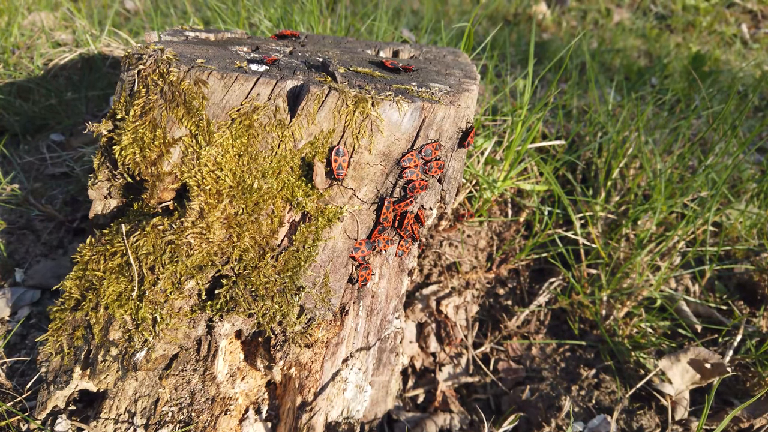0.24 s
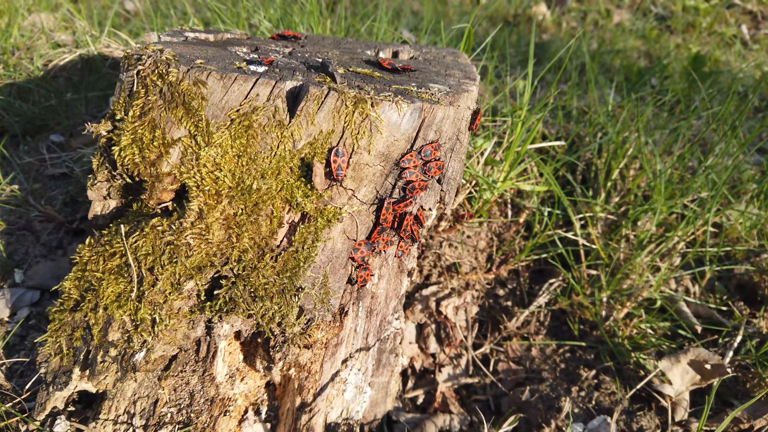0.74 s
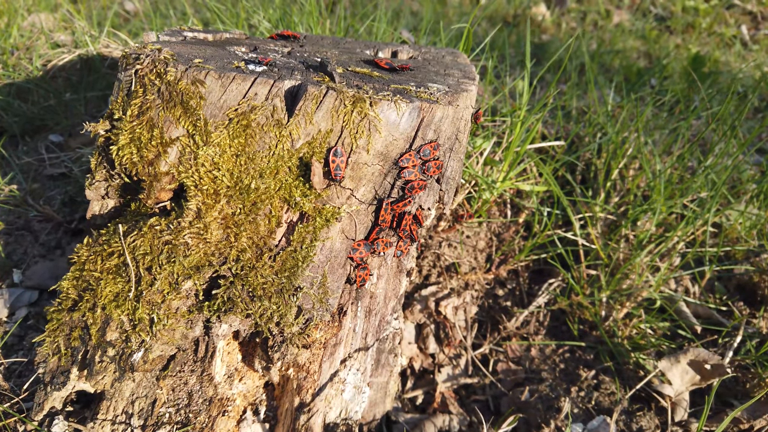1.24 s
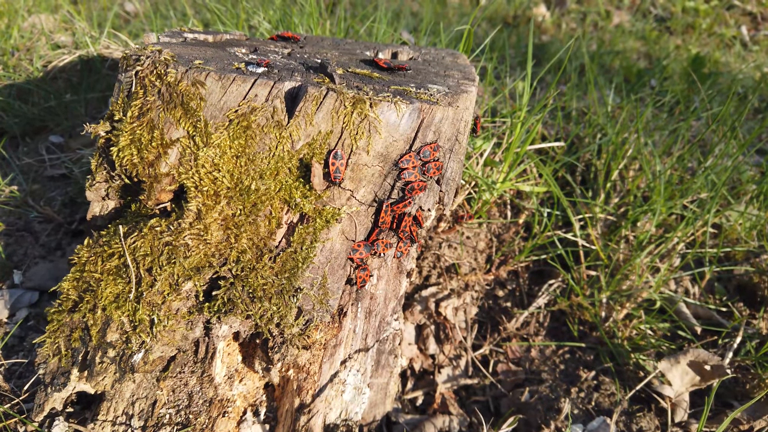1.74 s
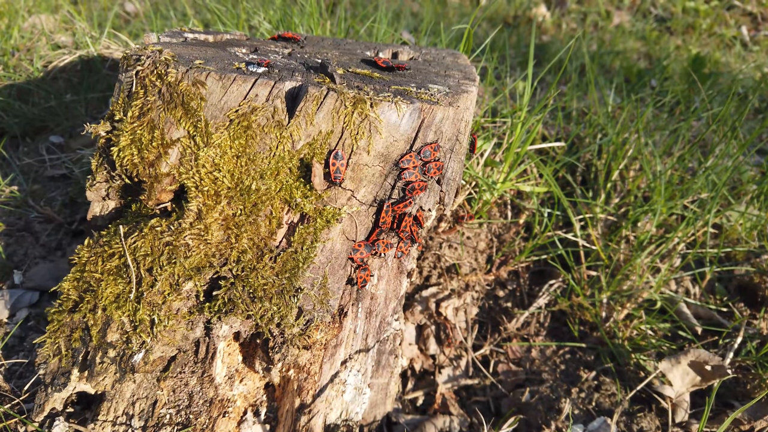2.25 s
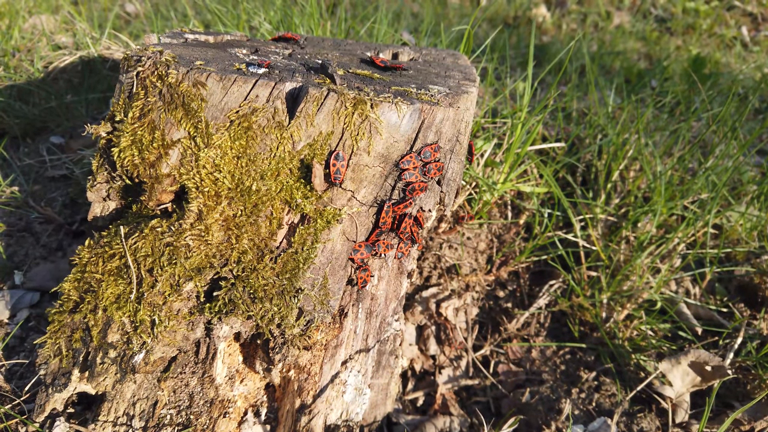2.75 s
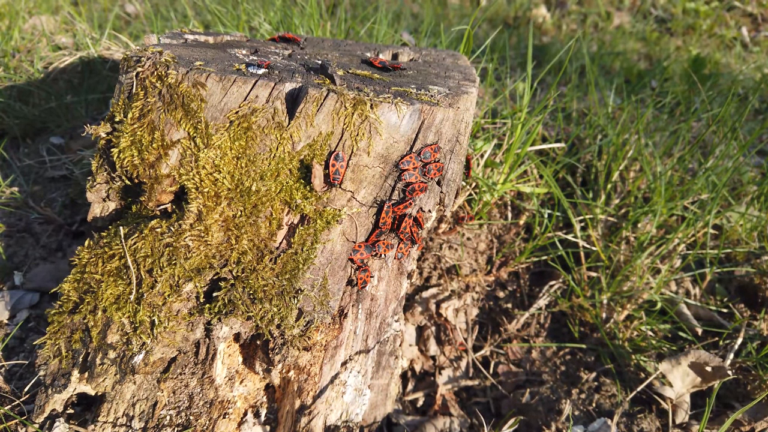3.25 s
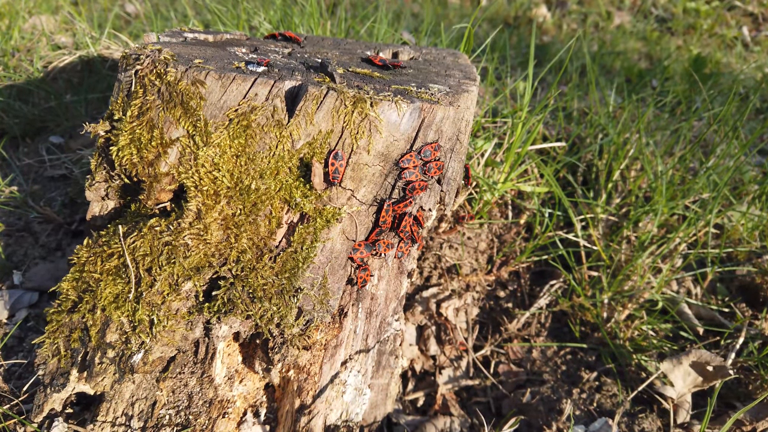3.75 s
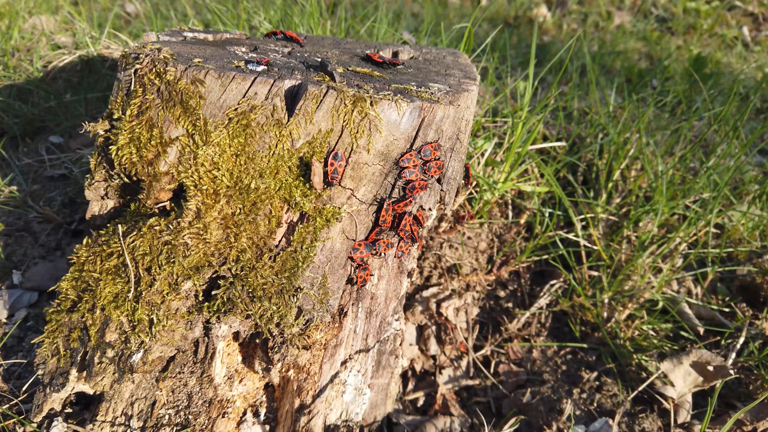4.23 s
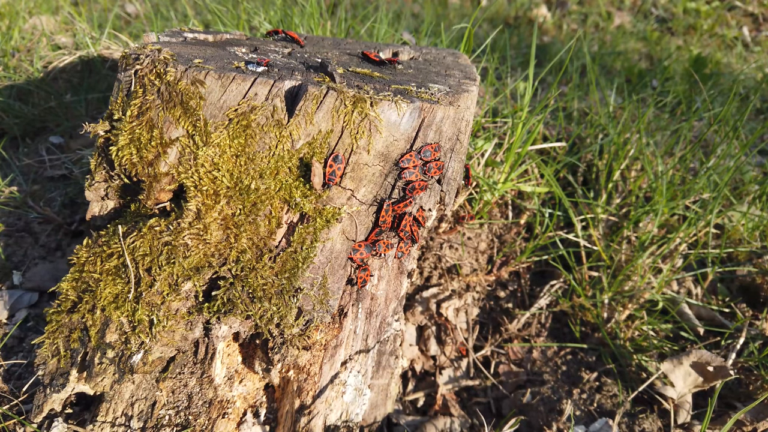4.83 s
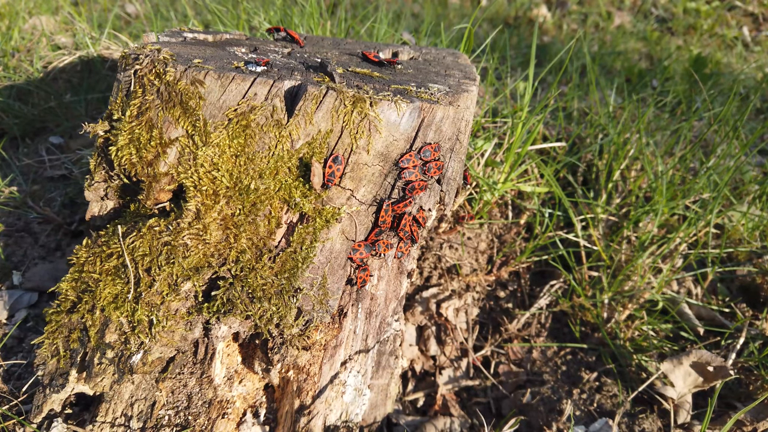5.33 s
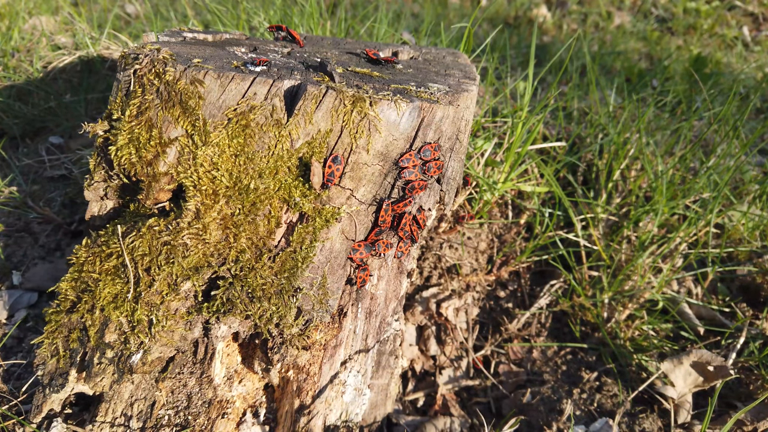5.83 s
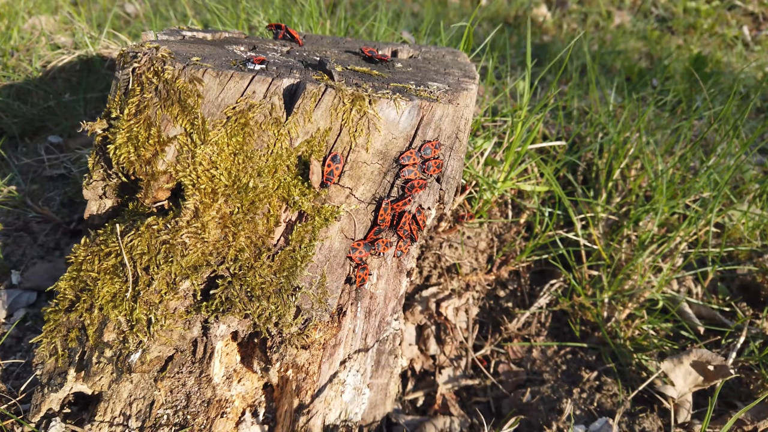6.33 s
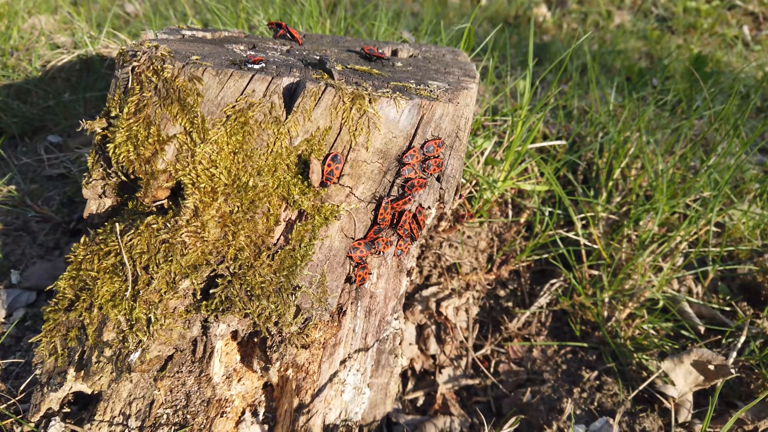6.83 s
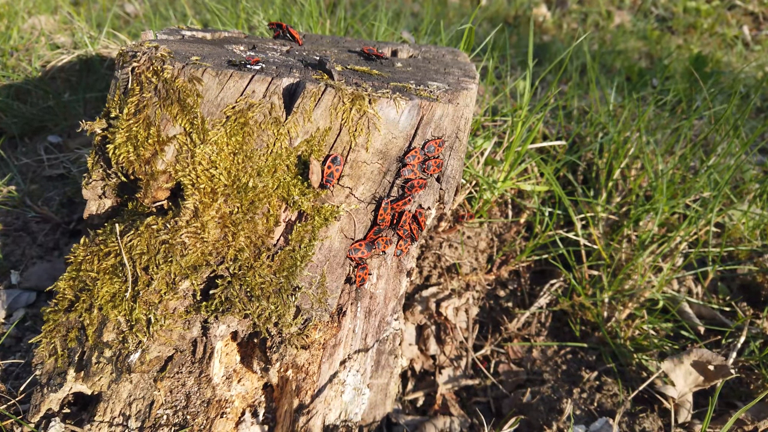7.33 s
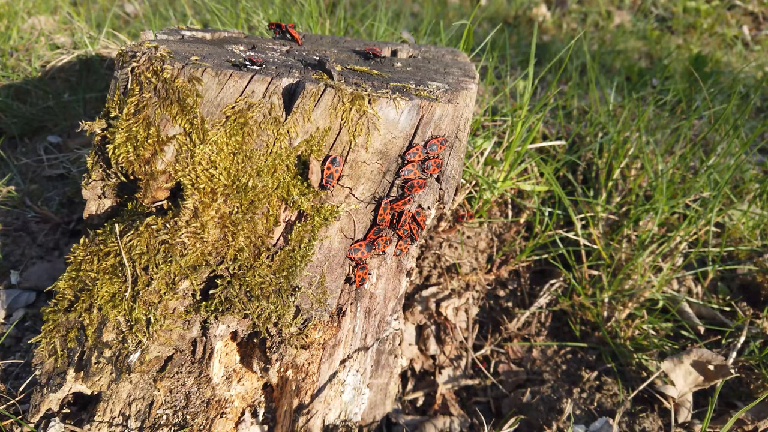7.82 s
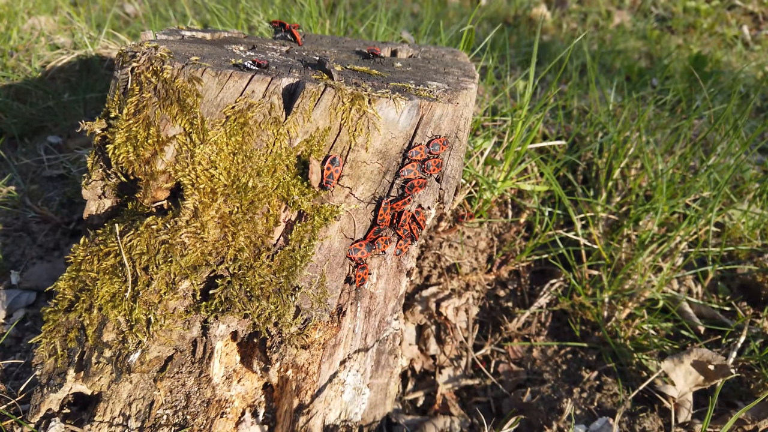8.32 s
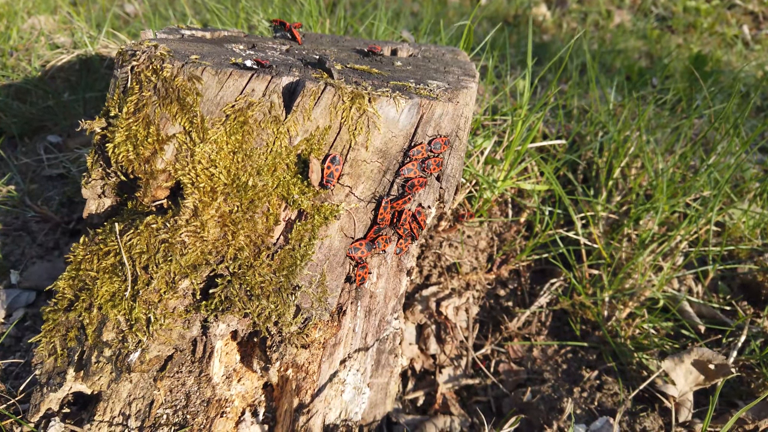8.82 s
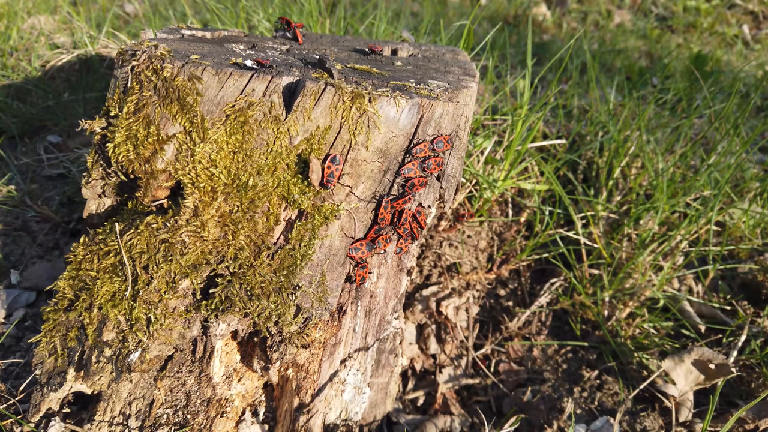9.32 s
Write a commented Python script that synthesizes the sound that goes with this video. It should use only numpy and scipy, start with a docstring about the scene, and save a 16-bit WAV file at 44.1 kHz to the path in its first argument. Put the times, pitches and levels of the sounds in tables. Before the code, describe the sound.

Wide stereo forest-edge ambience with a faint steady hiss, distant rumble and a shifting blur of far birdsong. At 0 s a near, centred songbird's phrase is just ending, while thin two-part calls sound at right. From 0.6 to 2.0 s the near bird sings quavering, hooked and sharply falling chirps. A quieter gap follows; at 2.4 s a bird far right begins a short, overtone-rich arched chirp, repeated irregularly until 7.5 s. The near bird returns at 3.1 s with chips, quick pips and a bright high trill at 4.1-4.5 s, sagging away by 4.7 s. Low piping runs faintly at right from 3.9 to 5.5 s, with a tiny dry tick near 4.8 s. Rolled trills come at 5.3-7.4 s. Near burbles and zigzags flash at 6.4-6.7, 7.4-7.7 and 8.2 s. Small distant whistles and descending chirps finish, mostly right. Every note trails a soft, scattered woodland echo.

```python
"""Forest edge, spring morning, in stereo. Near and dead ahead a songbird sings quick glides, zigzags and a high trill;
far to the right a second repeats an arched call rich in overtones; others whistle, buzz, pipe and roll further off.
Birds and hums are gliding tones with overtones or wavers; the litter ticks are short noise bursts.
Trunks scatter the birds' notes into a long tail of dying noise.
Beneath lie shaped noise for distant rumble and hiss, faint low hums and a patchy noise blur of far song."""
import sys
import numpy as np
from scipy import signal
from scipy.fft import rfft, irfft, next_fast_len
from scipy.io import wavfile

SR = 44100
rng = np.random.default_rng(int(sys.argv[2]) if len(sys.argv) > 2 else 0)


def unload_wav(signal):
    """Save mono or channel-first audio to the path in sys.argv[1] as 16-bit WAV at rate SR, clipped to [-1, 1]."""
    wavfile.write(
        sys.argv[1],
        SR,
        np.round(np.clip(np.atleast_2d(signal).T, -1, 1) * 32767).astype(np.int16),
    )


N = 422037   # samples

# Throughout, a bird's level/dB is its setting ahead of the mix gains in scene().


def from_db(db):
    """Turn decibels into an amplitude factor."""
    return 10 ** (np.asarray(db) / 20)


def rms_one(x):
    """Scale a sound to an rms of 1."""
    return x / np.sqrt(np.mean(x ** 2) + 1e-20)


def at_hz(points, hz):
    """Read a table on a log-frequency axis."""
    points = np.array(points)
    return np.interp(np.log(hz), np.log(points[:, 0]), points[:, 1])


def drift(rate, size=N):
    """Slow noise: random points of spread 1 joined by lines, rate points per s (390 at most)."""
    points = rng.standard_normal(int(size / SR * 400) + 2)
    return np.interp(np.arange(size) / SR * min(rate, 390), np.arange(len(points)), points)


def add(out, start, sound):
    """Mix a stereo sound in at a sample."""
    stop = min(N, start + sound.shape[1])
    out[:, start:stop] += sound[:, :stop - start]


def rounded(t, s, values):
    """A smooth cubic curve through points, flat at its turns."""
    steps = np.diff(values) / np.diff(s)
    same_way = steps[1:] * steps[:-1] > 0
    inner = np.where(same_way, (steps[1:] + steps[:-1]) / 2, 0)
    limit = 2 * np.minimum(abs(steps[1:]), abs(steps[:-1]))   # keeps the curve from overshooting
    slope = np.r_[steps[0], np.clip(inner, -limit, limit), steps[-1]]
    k = np.clip(np.searchsorted(s, t, "right") - 1, 0, len(s) - 2)
    width = np.diff(s)[k]
    u = (t - s[k]) / width
    rise = u * u * (3 - 2 * u)
    bend = width * u * (1 - u) * (slope[k] * (1 - u) - slope[k + 1] * u)
    return values[k] * (1 - rise) + values[k + 1] * rise + bend


def whistle(rows, overtones, pan_db, lag, waver_hz, flutter_db, swing_hz=0):
    """One note of a syrinx: a gliding tone with rounded turns, overtones and soft ends."""
    s, hz, level_db = np.transpose(rows)
    t = np.arange(s[0], max(s[-1], s[0] + .004), 1 / SR)
    pitch = rounded(t, s, hz)
    pitch = pitch + waver_hz * drift(60 + .6 * waver_hz, size=len(t))
    if swing_hz:
        pitch = pitch + swing_hz(t)
    phase = 2 * np.pi * np.cumsum(pitch) / SR + rng.uniform(0, 2 * np.pi)
    ends = np.clip(np.minimum(t - t[0], t[-1] - t) / .006, 0, 1)
    flutter = flutter_db * drift(220, size=len(t))
    gain = np.sqrt(2) * ends * from_db(np.interp(t, s, level_db) + flutter)
    out = np.zeros((2, len(t)))
    for multiple, db in overtones:
        heard = from_db(db - 3.6 * np.clip(multiple * pitch / 1000 - 12.5, 0, 30))   # the air dulls the very top
        behind = at_hz(lag, multiple * pitch)   # radians by which the left side lags
        out += heard * np.sin([multiple * phase - behind, multiple * phase])
    sides = from_db([[min(pan_db, 0)], [min(-pan_db, 0)]])   # pan_db is left minus right
    return round(s[0] * SR), out * gain * sides


def stretched(shape, s, length, top_hz, bottom_hz, level_db, growth_db=0):
    """Fit a shape to the length, range and level of one call."""
    share, height, db = np.transpose(shape)
    hz = bottom_hz + (top_hz - bottom_hz) * height
    return np.transpose([s + length * share, hz, level_db + db + growth_db * (share - .5)])


def sung(shape, calls):
    """All calls of one shape."""
    return [stretched(shape, *call) for call in calls]


# Depth and place of each quaver dip, as shares of the time between dips
DIP_HZ, FIRST_DIP, DIP_AT, BACK_AT = 1650, .57, .5, .85   # FIRST_DIP: share of the full depth
DIP_DB, SLIDE_DB, BACK_SHORT_HZ = -14, -16, 149


def quaver(s, slide, top_hz, rest_hz, length, every, level_db):
    """Slide down to the resting pitch, then dip below it, the first time less deeply."""
    rows = [(s, top_hz, level_db + SLIDE_DB), (s + slide, rest_hz, level_db)]
    for k in range(round(length / every)):
        depth = DIP_HZ * (1 if k else FIRST_DIP)
        rows += [(s + slide + (k + DIP_AT) * every, rest_hz - depth, level_db + DIP_DB),
                 (s + slide + (k + BACK_AT) * every, rest_hz - BACK_SHORT_HZ, level_db),
                 (s + slide + (k + 1) * every, rest_hz, level_db)]
    return rows


# Fast warble on the held high notes: start t/s, end t/s, swing at start f/Hz, swing at end f/Hz, rate/per s
WARBLE = [(4.12, 4.3, 800, 120, 88), (4.34, 4.53, 400, 150, 88)]


def warble(t):
    """The held notes flick up from their floor many times a second, less as they go on."""
    out = 0
    for start, end, first_hz, last_hz, rate in WARBLE:
        swing = np.interp(t, [start - .005, start, end], [0, first_hz, last_hz]) * (t < end + .02)
        out = out + swing * (np.sin(np.pi * rate * (t - start)) ** 4 - .2)
    return out


# Near singer's overtones: multiple of the pitch, level/dB
SONG_OVERTONES = [(2, -22.5), (3, -34.5)]
# Near singer across the stereo microphone: f/Hz, left lag/radians
SONG_LAG = [(1500, 0.39), (3000, 0.65), (4500, 1.35), (6800, 2.54), (9000, 3.46), (15000, 5.2)]
# Syllable shapes: t as share of length, f as height from bottom 0 to top 1, level/dB on top of the call's
SLUR = [(0, 0.96, -8), (.35, .75, -12), (.63, .25, -1.5), (1, 0.029, 4.5)]
HOOK = [(0, .88, -14), (.17, 1, -10), (.35, .62, -2), (.53, .29, -5), (.73, .46, 0), (1, 0, -15)]
CHECK = [(0, .6, -21), (.22, 0.97, -16.5), (.42, 0.67, -6.5), (.58, 0, -3), (1, .18, -8.5)]
CHIP = [(0, 0.803, 9), (.2, 0.94, -1.5), (.7, .72, -0.5), (1, 0, -4.5)]
ZIGZAG = [(0, -.45, -1.5), (.12, .88, -5), (.23, 0.985, -7.5), (.36, 0, -1.5), (.51, .78, -1), (.64, 0, -3),
          (.73, .57, 0), (1, .52, -9.5)]
DROP = [(0, 0.93, -1), (.22, 0.34, -1), (.5, .13, -10.5), (1, 0, -11)]
PIP = [(0, 0.99, 18.5), (.2, 0.037, -4.5), (1, 0, 5.5)]
TWITTER = [(0, 0.049, -20), (.34, 0.97, -8.5), (.54, .58, -7), (.76, .93, -0.5), (1, 0.52, -4)]
BURBLE = [(0, 0, -22.5), (.27, 0.99, 2), (.4, .66, 5), (.47, .85, -7), (.59, .15, -8.5), (.67, .6, -1),
          (1, .5, -11.5)]
TRILL = [(0, 0.27, 0), (.035, 0.15, -8), (.06, 0.73, -9), (.095, .05, -9), (.13, 0.59, -3.5),
         (.26, 1.02, -6), (.63, .9, 0), (1, .88, -21)]
SAG = [(0, 1, -5.5), (.3, .56, 1.5), (.6, .24, -4), (1, 0.082, 0)]
# When each is sung: start t/s, length t/s, top f/Hz, bottom f/Hz, level/dB (tone sounds at 0.99 of f)
SLURS = [(1.572, 0.04, 6350, 3870, -18.5), (1.676, .038, 6260, 3635, -16),
         (1.776, 0.032, 6280, 3090, -18.5)]
CHECKS = [(1.445, .066, 6280, 3756, -19.5)]
CHIPS = [(3.089, 0.039, 6000, 1560, -33), (3.345, 0.031, 3790, 2120, -18.5),
         (3.518, 0.032, 3695, 2506, -17.5), (3.667, 0.023, 4165, 2990, -19),
         (5.484, .195, 7760, 7250, -37.5), (6.503, .042, 3980, 2960, -31)]
ZIGZAGS = [(6.61, 0.095, 8790, 4920, -19.5), (7.574, 0.1, 8580, 4650, -19), (8.236, .1, 8510, 5120, -18.5)]
DROPS = [(1.877, .039, 4590, 2900, -17), (1.991, 0.0366, 3830, 2768, -19.5)]
PIPS = [(3.777, 0.019, 4940, 4290, -18), (3.858, 0.022, 5000, 4440, -20.5),
        (3.932, 0.0287, 5170, 4515, -20.5), (4.01, 0.023, 4350, 4440, -22.5)]
TWITTERS = [(3.056, .041, 4220, 1527, -18.5)]
SAGS = [(0.0, 0.044, 7250, 6870, -28.5), (.615, 0.077, 3220, 2006, -43), (4.52, 0.17, 6170, 4930, -24),
        (6.342, 0.13, 7280, 5800, -34.5)]
# Those that also grow or fade: start t/s, length t/s, top f/Hz, bottom f/Hz, level/dB, growth/dB
HOOKS = [(.963, .07, 6400, 1950, -22.5, -7), (1.118, .069, 5950, 1900, -17, 9)]
BURBLES = [(6.389, 0.09, 4150, 1830, -19.5, 1.9), (7.381, .075, 3640, 1942, -20, -2.4)]
TRILLS = [(4.095, .205, 7196, 4950, -18.5, 2), (4.312, .218, 7070, 5160, -18.5, -3)]
# A slide that settles, then quavers: start t/s, slide t/s, top f/Hz, rest f/Hz, quaver t/s, between dips t/s, level/dB
QUAVERS = [(.618, .04, 6400, 4840, .04, 0.017, -31), (0.729, .049, 6830, 5200, .0525, 0.02, -19.5)]
# End of a phrase already under way: t/s, f/Hz, level/dB
OPENING = [(0.0, 2450, -16), (0.014, 2330, -28.5), (0.024, 2080, -32), (0.036, 1520, -44),
           (0.056, 1846, -38), (0.08, 1590, -38)]
CLEAR_FLUTTER_DB, BURRY_FLUTTER_DB = 1.7, 3


def near_singer(overtones):
    """Clean gliding tones straight ahead; twitters, burbles, trills, sags and the opening are a little burry."""
    out = np.zeros((2, N))
    clear = (sung(SLUR, SLURS) + sung(HOOK, HOOKS) + sung(CHECK, CHECKS) + sung(CHIP, CHIPS)
             + sung(ZIGZAG, ZIGZAGS) + sung(DROP, DROPS) + sung(PIP, PIPS)
             + [quaver(*call) for call in QUAVERS])
    burry = (sung(TWITTER, TWITTERS) + sung(BURBLE, BURBLES) + sung(TRILL, TRILLS) + sung(SAG, SAGS)
             + [OPENING])
    for flutter_db, notes in (CLEAR_FLUTTER_DB, clear), (BURRY_FLUTTER_DB, burry):
        for rows in notes:
            add(out, *whistle(rows, overtones, 0.62, SONG_LAG, 33.5, flutter_db, warble))
    return out


# Strength of the trunks' scatter: f/Hz, level/dB
SCATTER = [(1200, -7.5), (2500, 0), (4000, -4), (6000, 2), (9000, -4), (13000, 0.5)]
# Time for the scatter to die by 60 dB, apart from the early boost: f/Hz, t/s
FOREST_T60 = [(300, 2.6), (2000, 1.26), (4000, 1.12), (8000, 0.69), (14000, 0.41)]
# The trunks round the clearing answer strongly early on: boost midway down at t/s, upper bound of its extra gain
EDGE_S, EDGE_GAIN = 0.0267, 1


def forest(dry, rise_s, alike):
    """Scatter from trunks: noise dying by band, partly its own on each side; louder at first."""
    t = np.arange(round(1.6 * SR)) / SR
    edges, tail = np.geomspace(200, 19000, num=12), 0
    for low, high in zip(edges, edges[1:]):
        middle = np.sqrt(low * high)
        band_filter = signal.butter(2, [low, high], "band", fs=SR, output="sos")
        band = signal.sosfilt(band_filter, rng.standard_normal((2, len(t))))
        tail = tail + band * from_db(at_hz(SCATTER, middle) - 60 * t / at_hz(FOREST_T60, middle))
    onset = 1 - np.exp(-(t / rise_s) ** 2)
    early = 1 + EDGE_GAIN / (1 + np.exp((t - EDGE_S) / 0.072))
    tail = tail * onset * early
    tail = tail + alike * tail[::-1]
    tail = tail / np.sqrt(np.sum(tail ** 2, axis=1, keepdims=True))
    size = next_fast_len(N + len(t))
    return irfft(rfft(dry, size) * rfft(tail, size), size)[:, :N]


# Likeness of the background at the two sides: f/Hz, correlation
LIKENESS = [(60, .2), (130, 0.46), (640, 0.34), (3100, 0.51), (6800, 0), (15000, 0)]


def banded_noise(spectrum, patchy_db, rate):
    """Coloured stereo noise; if patchy, each band swells and fades on its own; rms 1."""
    hz = np.fft.rfftfreq(N, 1 / SR) + 1
    alike = np.clip(at_hz(LIKENESS, hz), -1, 1)
    mid, side = rfft(rng.standard_normal((2, N))) * from_db(at_hz(spectrum, hz))
    both = np.sqrt(1 + alike) * mid + np.sqrt(1 - alike) * side * [[1], [-1]]
    if not patchy_db:
        return rms_one(irfft(both, N))
    edges, out = np.geomspace(1500, 9500, num=10), 0
    for low, high in zip(edges, edges[1:]):
        band = irfft(both * (hz >= low) * (hz < high), N)
        out = out + band * from_db(patchy_db * drift(rate))
    return rms_one(out)


# Blur of far song, ahead of the trims: t/s, level/dB
CHORUS = [(0.0, -33), (0.59, -49), (0.98, -36.5), (1.44, -51), (1.73, -38), (2.53, -42), (4.5, -35),
          (4.82, -51.5), (7.7, -39.5), (7.94, -49), (8.58, -42), (9.11, -48.5), (9.57, -45.5)]
# Its colour: f/Hz, relative level/dB per Hz
CHORUS_COLOUR = [(1500, -18), (2300, -4.5), (3300, 4), (5000, -1), (7000, -2), (8200, -10.5), (9200, -26)]


def far_chorus():
    """Many far voices blurred into noise whose bands swell and fade."""
    s, level_db = np.transpose(CHORUS)
    level = from_db(np.interp(np.arange(N) / SR, s, level_db) - 0.5)
    return level * banded_noise(CHORUS_COLOUR, 3.8, 9)   # patchiness/dB, drift points per s


# Distant rumble and hiss: f/Hz, relative level/dB per Hz
AIR = [(24, -58), (40, -37), (96, -27), (179, -7.5), (254, 2), (409, 2), (1620, -14.5), (1980, -14.5),
       (3430, -6.5), (4080, -12), (4990, -10), (6900, -42), (9090, -28), (11700, -31.5), (15800, -28)]


def air():
    """Steady noise shaped into distant rumble and hiss."""
    return from_db(-44.5) * banded_noise(AIR, 0, 0)


# Further birds: start t/s, length t/s, from f/Hz, to f/Hz, level/dB, left minus right/dB (sound at 0.98 of f)
WHISTLES = [(2.229, 0.065, 7200, 6900, -51, -11.5), (3.228, 0.035, 6400, 7200, -50, -1.5),
            (4.764, 0.23, 2300, 3690, -53, -4), (5.092, 0.134, 3840, 3810, -51, -5),
            (5.09, 0.097, 4630, 4640, -55, -8), (5.395, 0.01, 4640, 8400, -38, -32),
            (5.645, 0.011, 2000, 4820, -40, -11.5), (5.663, 0.061, 5000, 6900, -47.5, -20),
            (5.887, .115, 7700, 5800, -41.5, -28), (6.081, 0.19, 4420, 4511, -42.5, -2),
            (6.32, 0.076, 5900, 5840, -44, -17), (7.014, 0.018, 7270, 7770, -46.5, -19),
            (7.166, 0.0098, 6890, 8000, -39.5, -13), (7.345, 0.034, 4700, 6950, -39.5, -26),
            (7.944, 0.17, 2800, 3750, -54.5, -7), (8.156, 0.14, 3100, 3254, -46, -4),
            (8.221, 0.13, 2500, 2418, -45.5, -14), (8.297, .12, 3300, 3212, -38.5, -9),
            (8.49, .04, 3020, 2085, -44.5, -18), (8.525, 0.16, 3500, 3506, -40.5, 5),
            (8.6, 0.14, 2800, 2883, -46.5, -12), (8.61, 0.036, 5920, 4900, -46, -13.5),
            (8.682, 0.028, 5960, 4890, -38.5, -20), (8.72, .16, 3500, 3380, -50, 20),
            (8.754, .03, 5560, 4200, -39, -22), (9.207, 0.045, 5000, 3960, -46.5, -18),
            (9.199, 0.041, 2550, 2050, -50, -16.5), (9.354, 0.023, 6040, 4000, -47, -15),
            (9.36, 0.044, 2750, 2130, -51, -10), (9.424, .05, 2910, 4100, -46.5, -7),
            (9.481, .03, 5860, 4980, -40.5, -20), (9.553, 0.0244, 5560, 4590, -35, -23)]
BUZZES = [(0.439, 0.081, 3030, 3400, -47, 4), (1.68, 0.14, 7800, 7530, -44, 12),
          (2.071, 0.12, 5200, 5720, -48.5, -19), (2.461, 0.18, 5130, 5120, -43.5, -14.5),
          (2.598, 0.14, 5630, 6760, -51.5, -5), (2.9, 0.21, 4460, 4643, -45, 19),
          (3.1, .09, 3200, 2990, -37, -5), (6.32, 0.045, 3590, 3640, -37.5, -21),
          (6.375, 0.034, 4400, 4670, -36, -9), (8.825, 0.14, 7060, 6900, -45, -16.5)]
WHISTLE_WAVER_HZ, BUZZ_WAVER_HZ = 63, 333.4
FADE_DB_PER_S, RISING = 40, 1.2   # notes that climb by this ratio or more do not fade
# A two-part call: t/s, held f/Hz (sounds at 0.96 of it), level/dB
TWO_PARTS = [(.112, 4870, -42), (.28, 4650, -41.5), (.455, 4650, -43)]
# Its upward flick, then its held note: t/s, f as share of held pitch, level/dB on top of the call's
FLICK = [(0, 0.94, 0), (0.012, 1.24, 2)]
HELD = [(.02, .99, 0), (.14, 1.015, -8)]


def further_birds():
    """Unsteady whistles and buzzes from their own sides, fading unless they climb, and a two-part call."""
    out, lag = np.zeros((2, N)), [(1000, 0.02), (9000, .1)]
    for waver_hz, notes in (WHISTLE_WAVER_HZ, WHISTLES), (BUZZ_WAVER_HZ, BUZZES):
        for s, length, from_hz, to_hz, level_db, pan_db in notes:
            fade_db = FADE_DB_PER_S * length * (to_hz < RISING * from_hz)
            rows = [(s, from_hz, level_db), (s + length, to_hz, level_db - fade_db)]
            add(out, *whistle(rows, [(0.98, 1)], pan_db, lag, waver_hz, 1.74))
    for s, held_hz, level_db in TWO_PARTS:
        for part in FLICK, HELD:
            rows = np.array(part) * [1, held_hz, 1] + [s, 0, level_db]
            add(out, *whistle(rows, [(0.96, 0.52)], -22, lag, WHISTLE_WAVER_HZ, 2.0))
    return out


# Faint low hums that swell and fade: middle t/s, length t/s, f/Hz, level at the middle/dB
HUMS = [(2.593, 3.1, 441.5, -57), (4.908, 0.46, 359, -49.5), (5.603, 1.1, 362, -54.5),
        (6.504, .9, 358, -46), (7.403, 1.9, 361, -55), (8.999, 0.9, 369, -58), (6.499, .9, 422.1, -51),
        (7.807, 1.72, 418, -57.5)]
HUM_SWELL_DB = 13


def hums():
    """Soft low tones that drift a little."""
    out = np.zeros((2, N))
    for middle, length, hz, level_db in HUMS:
        rows = [(middle + side * length / 2, hz, level_db - abs(side) * HUM_SWELL_DB) for side in (-1, 0, 1)]
        add(out, *whistle(rows, [(1, 0)], -0.79, [(100, 0), (900, .1)], 3.05, 2.0))
    return out


# The arched call around its top: t/s, f as share of top pitch, level/dB on top of the call's
ARCH = [(-.052, .83, 1), (-.04, .68, -13.5), (-.03, .71, -20), (-.016, .775, -5.5), (-.006, .94, -2.5),
        (0, 1, -1.5), (.007, 0.93, -4.5), (0.014, 0.727, 12.5)]
# Its overtones: multiple of the pitch, level/dB
ARCH_OVERTONES = [(1, -6), (2, 1.5), (3, -9), (4, -26.5), (5, -24), (6, -28)]
# Each arched call: t/s of the top, top f/Hz, level/dB
ARCHES = [(2.405, 2620, -29), (3.259, 2700, -27.5), (3.519, 2743, -28), (3.931, 2653, -26),
          (4.337, 2696, -23.5), (4.605, 2746, -26), (5.754, 2642, -22), (6.008, 2705, -22.5),
          (6.476, 2686, -21), (7.451, 2604, -23), (9.545, 2720, -53)]
ARCH_PAN_DB = -17   # left minus right: far to the right


def arch_caller():
    """One call shape rich in overtones, a little higher or lower each time."""
    out = np.zeros((2, N))
    for top, top_hz, level_db in ARCHES:
        rows = np.array(ARCH) * [1, top_hz, 1] + [top, 0, level_db]
        add(out, *whistle(rows, ARCH_OVERTONES, ARCH_PAN_DB, [(1000, -14.0), (9000, 4.0)], 35.1, 1.26))
    return out


# A low piping bird: t/s of the top, top f/Hz (sounds at 0.97 of it), level/dB
PIPES = [(3.885, 1576, -50), (3.96, 1834, -45), (4.094, 1850, -43.5), (4.175, 1503, -48.5),
         (4.325, 1783, -46.5), (4.405, 1470, -52.5), (4.573, 1820, -46), (4.806, 1840, -44.5),
         (4.89, 1457, -52), (5.044, 1810, -47), (5.133, 1600, -49.5), (5.239, 1830, -50),
         (5.325, 1810, -50), (5.48, 1620, -54.5)]
# Its small arch: t/s, f as share of top pitch, level/dB on top of the note's
PIPE_ARCH = [(-.022, .84, -7), (0, 0.98, 5), (.026, .76, -5)]


def piper():
    """Each gliding tone rises to its top and falls away, off to the right."""
    out = np.zeros((2, N))
    for top, top_hz, level_db in PIPES:
        rows = np.array(PIPE_ARCH) * [1, top_hz, 1] + [top, 0, level_db]
        add(out, *whistle(rows, [(0.97, 0)], -23, [(1000, 0), (9000, 0.11)], 8.2, 1.0))
    return out


# Dry ticks in the litter: t/s, nominal peak level/dB
TICKS = [(4.8294, -36.5), (5.0654, -47.5)]


def ticks():
    """Short bright bursts of noise."""
    out, t = np.zeros((2, N)), np.arange(round(.06 * SR)) / SR
    bright = signal.butter(2, [4500, 13500], "band", fs=SR, output="sos")
    for s, peak_db in TICKS:
        burst = signal.sosfilt(bright, rng.standard_normal((2, len(t))))
        add(out, round(s * SR), burst * from_db(peak_db - 8 - 60 * t / 0.37))
    return out


# A far bird's rolled phrase: start t/s, length t/s, level as the trill begins/dB
ROLLS = [(5.254, 0.084, -37), (5.431, 0.17, -45), (5.618, 0.16, -41.5), (6.635, 0.079, -36),
         (6.856, 0.12, -44), (7.043, 0.15, -44), (7.21, 0.21, -44.5)]
# Pitches sound at 0.99 of these; the rate is in swings per s
ROLL_LEAD_HZ, ROLL_MID_HZ, ROLL_SWING_HZ, ROLL_RATE = 2450, 3080, 540, 44


def roller():
    """After a low lead-in the pitch swings over half an octave, a wide trill."""
    out = np.zeros((2, N))
    for start, length, level_db in ROLLS:
        rows = [(start, ROLL_LEAD_HZ, level_db - 8), (start + .027, ROLL_LEAD_HZ * 1.08, level_db - 4),
                (start + 0.026, ROLL_MID_HZ, level_db), (start + length, ROLL_MID_HZ, level_db - 12.5)]

        def swing(t):
            since = t - start - .034
            return ROLL_SWING_HZ * (t > start + .034) * np.sin(2 * np.pi * ROLL_RATE * since)

        add(out, *whistle(rows, [(0.99, 0)], -22, [(1000, 0), (9000, .1)], 84, 6.6, swing))
    return out


def scene():
    """Direct birds, ticks and hums, the forest's answer to the birds, and the background."""
    near, overtones, arch = near_singer([(0.99, 0.015)]), near_singer(SONG_OVERTONES), arch_caller()
    pipes = piper()
    further = from_db(3.5) * (further_calls := further_birds())
    rolls = from_db(5) * roller()
    # the tail comes from all sides; overtones are beamed away and arrive mostly scattered
    sent = from_db(-3) * near + from_db(-7) * pipes + from_db(-6.0) * overtones
    sent = sent + further + rolls + from_db(-6) * arch
    direct = near + from_db(-8) * overtones + from_db(4.0) * further_calls + rolls
    direct = direct + arch + pipes + ticks() + hums()
    tail = forest(sent[1], .01, 0.18) * from_db([[-1.5], [0]])   # fed by the right side; rises over about 10 ms
    background = (far_chorus() + air()) * from_db([[-1.2], [0]])
    return direct + tail + background


def record(dry):
    """The microphone lifts a band near 12 kHz; the top is cut above 15870 Hz."""
    b, a = signal.iirpeak(12000, 4.0, fs=SR)
    coloured = dry + from_db(4.5) * signal.lfilter(b, a, dry)
    return signal.sosfilt(signal.ellip(14, .5, 80, 15870, fs=SR, output="sos"), coloured)


dry = scene()
out = record(dry)
unload_wav(out)
```